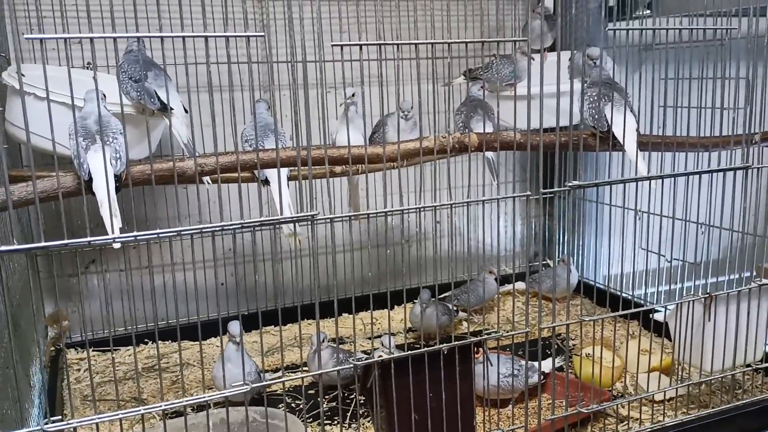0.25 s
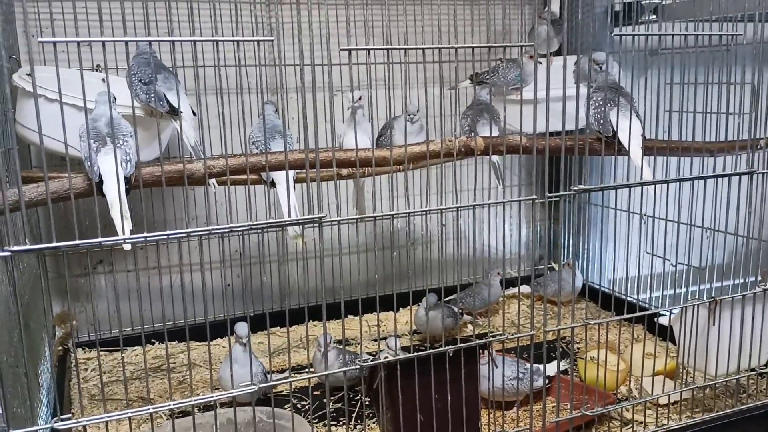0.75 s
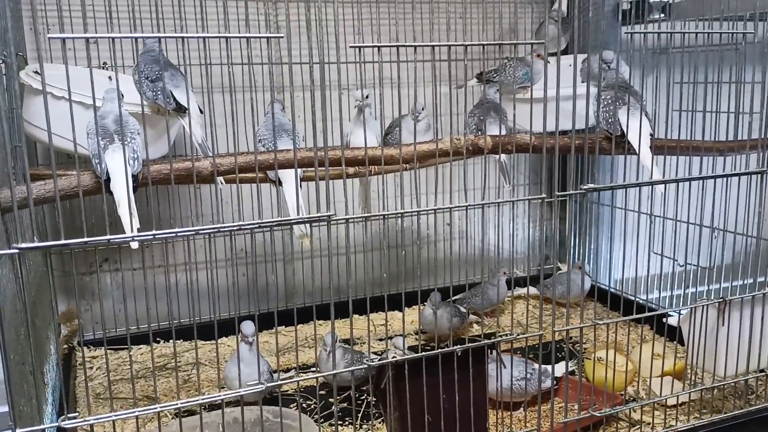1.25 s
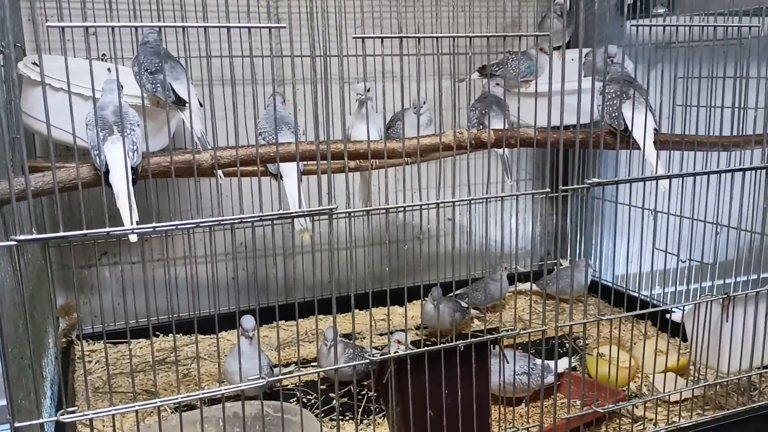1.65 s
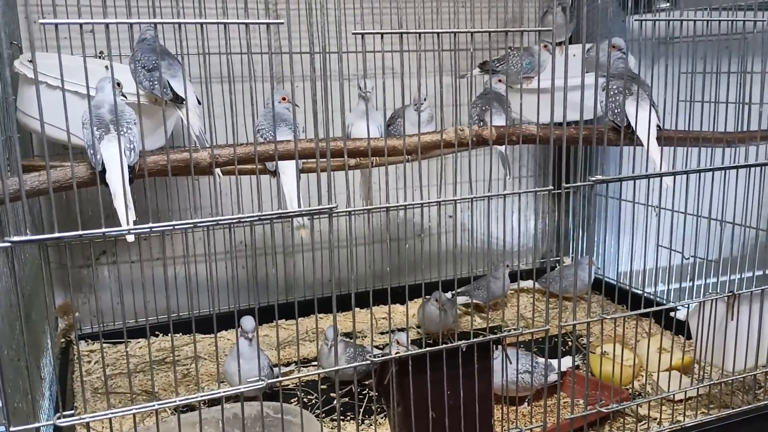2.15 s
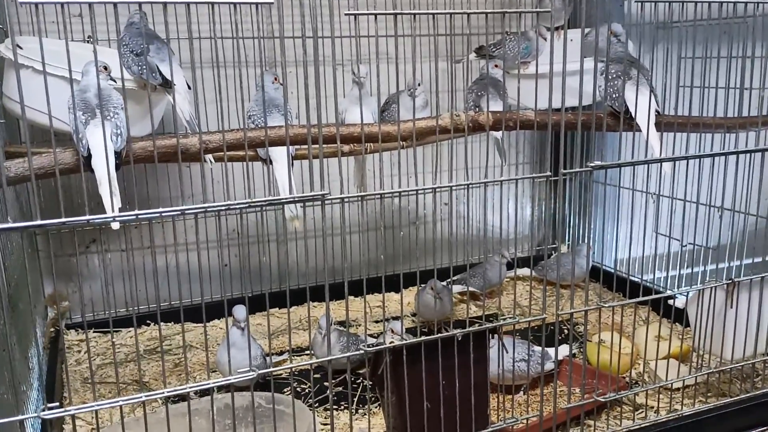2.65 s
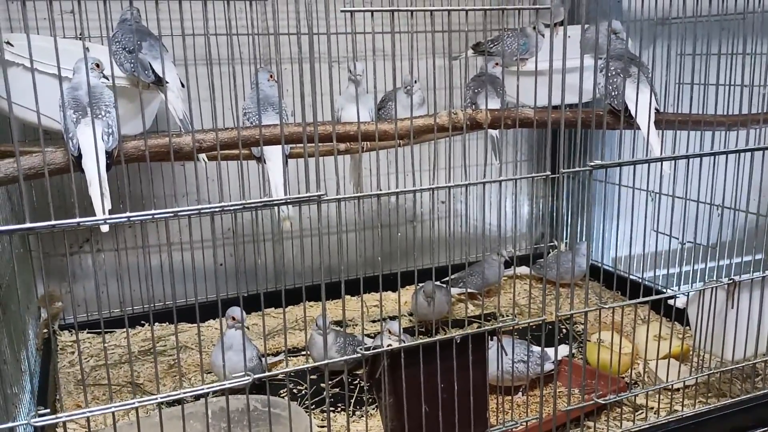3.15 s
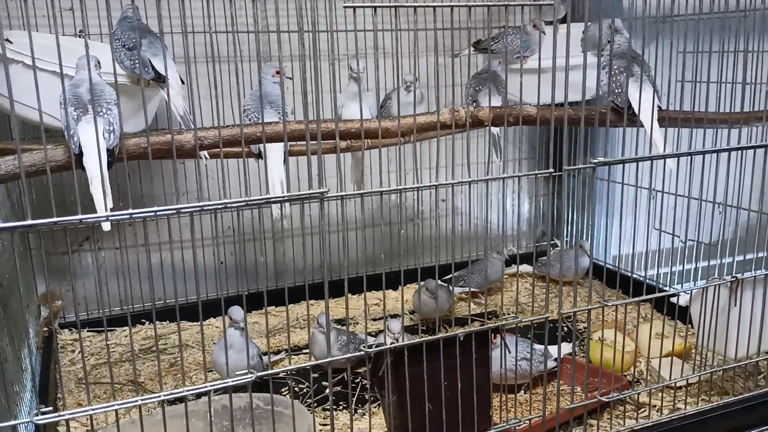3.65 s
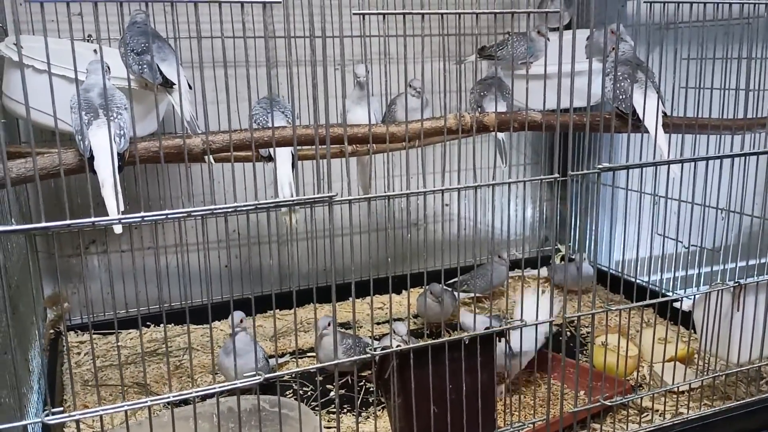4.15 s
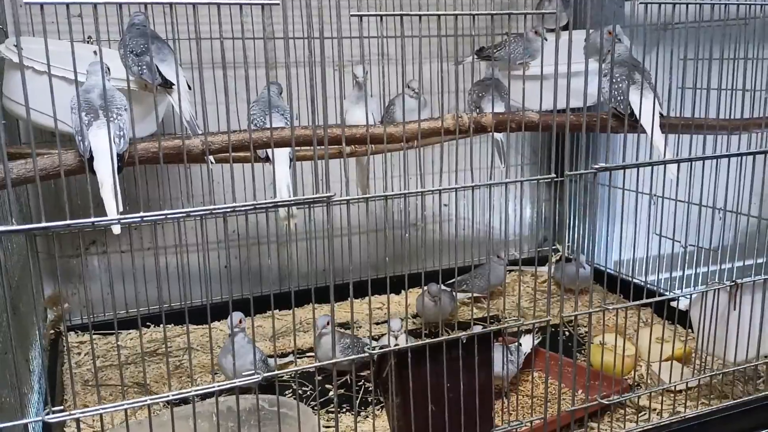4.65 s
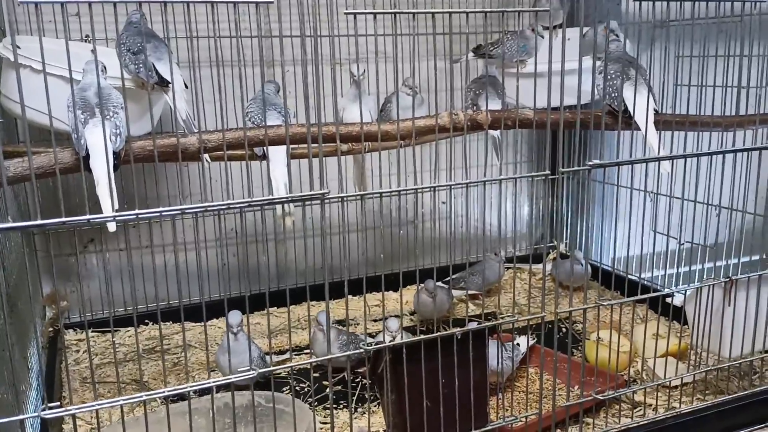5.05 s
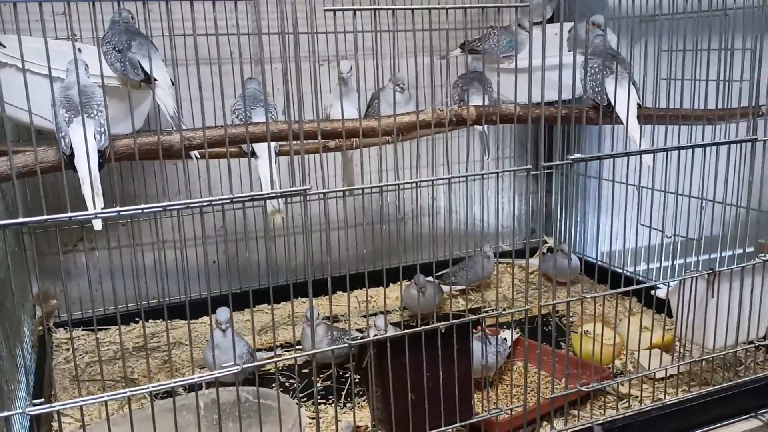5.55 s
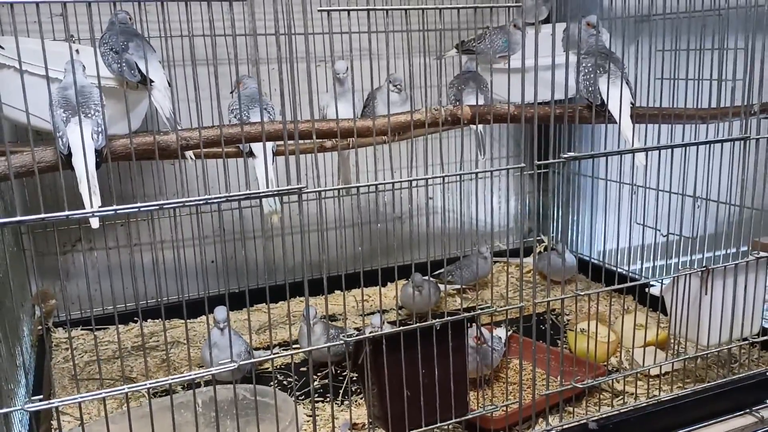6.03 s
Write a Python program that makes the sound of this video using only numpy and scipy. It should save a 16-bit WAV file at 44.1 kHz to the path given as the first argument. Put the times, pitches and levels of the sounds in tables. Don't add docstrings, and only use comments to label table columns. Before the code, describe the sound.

In an echoing indoor aviary, a caged bird gives a short run of nasal chatter, followed by quiet murmurs and a clear rising whistle. Wings then clap sharply with low thuds of air and feather hiss. After faint peeps and more flapping, a loud close squawk scoops upward with a low answer behind it. A final distant whistle and tiny peeps end the scene. Small microphone, quiet hum, clipped tails.

```python
import sys
import numpy as np
from scipy import signal
from scipy.io import wavfile
from scipy.ndimage import uniform_filter1d

SR = 44100
rng = np.random.default_rng(int(sys.argv[2]) if len(sys.argv) > 2 else 0)


def waveform_to_disk(signal):
    frames = np.transpose(np.atleast_2d(signal))
    scaled = np.clip(frames, -1, 1) * 32767
    samples = np.round(scaled).astype(np.int16)
    wavfile.write(sys.argv[1], SR, samples)


def volts_from_decibels(level):
    exponent = np.asarray(level, float) / 20
    return 10 ** exponent


N = 277277
EDGE_HZ = 15850


def evened(x):
    return x / np.sqrt(np.mean(x ** 2) + 1e-20)


def read(points, hz):
    f, value = np.transpose(points)
    return np.interp(np.log(hz + 1), np.log(f + 1), value)


def add(mix, s, sound):
    part = mix[max(round(s * SR), 0):][:len(sound)]
    part += sound[:len(part)]


def smoothed(x, size, axis=-1):
    return uniform_filter1d(uniform_filter1d(x, size, axis=axis), size, axis=axis)


def wander(count, size):
    return evened(smoothed(rng.standard_normal(count), size))


def noise(colour, count, patchy_db, size=512):
    hz = np.fft.rfftfreq(size, 1 / SR)
    a, b, patches = rng.standard_normal((4 * N // size + 8, len(hz), 3)).T
    patches = uniform_filter1d(uniform_filter1d(patches, size=6, axis=0), size=10, axis=1)
    level_db = read(colour, hz)[:, None] + patchy_db * evened(patches)
    z = (a + 1j * b) * volts_from_decibels(level_db)
    return evened(signal.istft(z, nperseg=size, noverlap=3 * size // 4)[1][:count])


def burst(rise, db, t60):
    t = np.arange(0, rise + t60, 1 / SR)
    level_db = db - 60 * np.maximum(t - rise, 0) / t60
    return (np.minimum(t / rise, 1) * volts_from_decibels(level_db)) ** 2


# (frequency [Hz], level [dB])
HUM_COLOUR = [(40, -21), (100, -6), (160, -15.5), (200, 8.5), (245, -21.5), (800, -19.5), (2500, -30),
              (4500, -30), (7800, -38), (11000, -37), (15500, -31.5)]


def room_hum():
    return volts_from_decibels(-62) * noise(HUM_COLOUR, N, patchy_db=2.3, size=1024)


# (time [s], level [dB])
AIR_STIR = [(0, -49), (.42, -59), (.55, -55.5), (1.498, -59.5), (1.88, -53.5), (2.15, -43), (2.4, -39),
            (2.62, -57), (3.2, -64), (3.33, -29), (3.45, -30), (3.8, -42), (4.149, -43.5), (4.5, -41),
            (4.85, -49.5), (5.08, -58.5), (5.799, -60.5), (6.29, -67)]
# (time [s], level [dB])
PUFFS = [(.12, -46), (.47, -48.5), (1.268, -48), (1.67, -56), (1.905, -35.5), (2.07, -36.5), (2.2, -35.5),
         (2.35, -43), (3.4, -33), (3.91, -35), (4.03, -34.5), (3.6, -38), (3.84, -36.5), (4.2, -40),
         (4.292, -51), (4.402, -31.5), (5.17, -53), (5.67, -51.5)]
# (frequency [Hz], level [dB])
AIR_COLOUR = [(76, -28), (130, -15.5), (188, -2), (309, -5.5), (348, -4.5), (453, -12.5), (596, -7.5),
              (645, -17.5), (786, -14.5), (1180, -24.5), (3000, -30.5), (3900, -56.5), (6600, -120)]
# (frequency [Hz], level [dB])
THUD_COLOUR = [(25, -29), (50, -9.5), (80, -6.5), (110, 0), (140, -21), (300, -61.5)]
# (frequency [Hz], width [Hz], level [dB])
CAGE_MODES = [(202.5, 14, 6), (353, 88, 3.5), (575, 18, -14)]


def wing_air():
    rush = noise(AIR_COLOUR, N, patchy_db=0.97, size=1024)
    thud = noise(THUD_COLOUR, N, patchy_db=-0.5, size=2048)
    shake, t = rng.standard_normal(N), np.arange(4000) / SR
    boom = np.zeros(N)
    for hz, width_hz, db in CAGE_MODES:
        ring = np.exp(-np.pi * width_hz * t) * np.sin(2 * np.pi * hz * t)
        boom += volts_from_decibels(db) * evened(signal.oaconvolve(shake, ring)[:N])
    stir_db = np.interp(np.arange(N) / SR, *np.transpose(AIR_STIR))
    power = volts_from_decibels(stir_db) ** 2
    rise_s, t60_s = 0.0098, 0.18
    for s, db in PUFFS:
        add(power, s - rise_s, burst(rise_s, db, t60_s))
    thud_db = -15.5 + 0.77 * stir_db
    return np.sqrt(power) * evened(rush + volts_from_decibels(-8) * boom) + volts_from_decibels(thud_db) * thud


# (time [s], rise [s], level [dB], decay t60 [s], crisp share [dB])
STROKES = [(0, 0.032, -42, 0.64, 5), (1.56, .06, -55, 2.3, 3.5), (1.68, 0.0085, -53.5, 0.65, -13),
           (1.75, 0.079, -46.5, 0.65, 6.5), (1.9, 0.015, -45, 1.8, -30), (2.05, .04, -49, 1.5, 3),
           (2.18, 0.0075, -41.5, 0.35, 2.5), (2.37, .03, -42, 0.44, -20), (2.74, 0.05, -65, 3.6, -6),
           (3.04, 0.0055, -57.5, 2.2, -10), (3.152, .012, -54.5, 2, 3.5), (3.232, 0.053, -40, 0.61, 10.5),
           (3.34, 0.031, -34.5, 0.89, -67), (3.5, 0.045, -50.5, 0.74, -7.5),
           (3.779, .02, -49.5, 3.5, -10.5), (3.9, .08, -38, 0.67, -14.5), (4.0, .07, -44, 1.3, 8.5),
           (4.23, 0.021, -40, 0.31, -12), (4.428, 0.014, -37, 0.31, -5), (4.62, .1, -54.5, 1, -18),
           (4.94, 0.011, -67, 0.52, 7.5), (5.39, .1, -70.5, 0.35, 10)]
# (time [s], level [dB], decay t60 [s], crisp share [dB])
CLAPS = [(2.001, -40, 1, -21), (2.135, -34, 0.39, -13), (2.266, -40, 0.34, 1.5), (2.31, -43, 0.34, 2),
         (2.346, -37, 0.33, -17), (2.427, -39.5, 0.28, -5), (4.482, -34, 0.51, -1.5)]
# (frequency [Hz], level [dB])
FEATHER_COLOUR = [(300, -15), (600, 0), (1200, -6), (2100, -5.5), (3400, -14.5), (5600, -11.5), (8000, -7),
                  (10600, -19), (13500, -16), (15500, -9)]


def feathers():
    hiss = noise(FEATHER_COLOUR, N, patchy_db=1.5)
    bright = evened(np.gradient(hiss))
    soft, crisp = np.zeros((2, N))
    clap_rise_s = 0.0011
    claps = [(s, clap_rise_s, *rest) for s, *rest in CLAPS]
    for s, rise, db, t60, crisp_db in STROKES + claps:
        add(soft, s, burst(rise, db, t60))
        add(crisp, s, burst(rise, db + crisp_db, t60))
    throb = volts_from_decibels(0.47 * wander(N, size=300))
    return throb * (np.sqrt(soft) * hiss + np.sqrt(crisp) * bright)


# (frequency [Hz], t60 [s])
ROOM_DECAY = [(300, 0.51), (1500, 0.72), (4000, 0.65), (8000, 0.49), (16000, 0.18)]


def room(x, direct_db, early_t60, late_db):
    hz, t, z = signal.stft(rng.standard_normal(SR), SR, nperseg=256)
    late = volts_from_decibels(late_db - 60 * t / read(ROOM_DECAY, hz)[:, None])
    early = volts_from_decibels(-60 * t / early_t60)
    tail = signal.istft(z * np.hypot(late, early), SR, nperseg=256)[1]
    tail = tail * np.clip(np.arange(len(tail)) / SR / 0.0012, 0, 1)
    return volts_from_decibels(direct_db) * x + signal.fftconvolve(x, tail / np.linalg.norm(tail))[:N]


def calls(tables, voice, *how, **more):
    track = np.zeros(N)
    for rows in tables:
        add(track, *voice(rows, *how, **more))
    return track


def unrolled(rows):
    s, *columns = np.transpose(rows)
    t = np.arange(s[0], s[-1], 1 / SR)
    return [s[0]] + [np.interp(t, s, c) for c in columns]


def nasal(rows, tract, jitter, breath_db, beak):
    s, hz, effort_db, tilt_db = unrolled(rows)
    turns = np.cumsum(hz * (1 + jitter * wander(len(hz), size=30))) / SR
    k = np.arange(1, 30)[:, None]
    tract_hz = k * hz * (hz.mean() / hz) ** beak
    colour_db = read(tract, tract_hz) + tilt_db * np.log2(k * hz / 3000)
    colour = volts_from_decibels(colour_db) * (k * hz < EDGE_HZ)
    rough = rng.standard_normal((2, len(k), len(hz)))
    rough = uniform_filter1d(uniform_filter1d(rough, size=36, axis=2), size=28, axis=2)
    a, b = evened(rough) / np.sqrt(2)
    breath = volts_from_decibels(breath_db) * np.minimum(k - .85, 1) * (a + 1j * b)
    overtones = ((1 + breath) * np.exp(2j * np.pi * k * turns + 1j * k ** 2)).real
    stack = (colour * overtones).sum(0) / np.sqrt((colour ** 2).sum(0))
    return s, volts_from_decibels(effort_db) * stack * signal.windows.tukey(len(hz), .25)


def syllable(row, shape, *how, **more):
    s, length, top_hz, effort_db, tilt_db = row
    rows = [(s + u * length, top_hz * pitch, effort_db + db, tilt_db + tilt)
            for u, pitch, db, tilt in shape]
    return nasal(rows, *how, **more)


# (time [s], pitch [Hz], effort [dB], brightness [dB per octave])
ANSWER = [
    [(0, 1348, -50, -10), (.04, 1257, -49, -7), (.09, 1227, -48, 2), (.125, 1170, -54, -8)],
    [(4.1, 826, -50, 0.0082), (4.125, 803.5, -23.5, 0.017), (4.19, 786, -39, 0.014),
     (4.25, 793, -27.5, 0.018), (4.3, 755, -43, 0.0035)],
]
# (frequency [Hz], level [dB])
ANSWER_TRACT = [(400, -29), (790, -8), (1580, -3), (2370, -7.5), (3160, -6), (5000, -9), (8000, -23.5),
                (15000, -40)]
# (time [s], length [s], top pitch [Hz], effort [dB], brightness [dB per octave])
MURMUR = [(1.105, 0.094, 693, -41.5, -0.88), (1.245, 0.044, 587, -43.5, -1.8),
          (1.372, 0.087, 690.5, -48.5, -0.79)]
# (share of length, pitch against top, effort [dB], brightness [dB per octave])
MURMUR_SLIDE = [(0, 1, 0.5, 2), (0.198, 1, 0, 0.966), (.55, .88, -5, -0.64), (1, .86, 2.5, -2.4)]
# (frequency [Hz], level [dB])
MURMUR_TRACT = [(240, -47), (400, -16.5), (624, -5), (695, -10.5), (1720, -9.5), (2490, -9), (3820, -19),
                (5200, -8), (7170, -12.5), (8630, -11.5), (9460, -18.5), (12100, -26), (15700, -27.5)]


def murmurs():
    low = calls(ANSWER, nasal, ANSWER_TRACT, jitter=0.0048, breath_db=-26, beak=.4)
    low += calls(MURMUR, syllable, MURMUR_SLIDE, MURMUR_TRACT, jitter=.01, breath_db=-5, beak=0)
    return room(low, direct_db=-0.5, early_t60=0.15, late_db=-6.5)


# (time [s], length [s], top pitch [Hz], effort [dB], brightness [dB per octave])
CHATTER = [(.42, 0.093, 862, -35, 1), (.546, 0.086, 835, -24.5, 0.5), (.672, 0.065, 849, -24, 3),
           (.803, 0.081, 810, -24, 0.5), (.895, 0.12, 738, -42, -1.5)]
# (share of length, pitch against top, effort [dB], brightness [dB per octave])
CHATTER_ARCH = [(0, .66, -7.5, -2), (.17, 1, -0.5, 1.5), (0.421, 0.95, 2.5, 3.5), (0.681, .7, -13.5, -2.5),
                (1, 0.72, -14.5, -11.5)]
# (frequency [Hz], level [dB])
CHATTER_TRACT = [(400, -16), (530, -4), (800, 3), (1600, -4), (2000, 0.5), (2500, -1), (3200, 8.5),
                 (3800, -38), (4400, -6.5), (5400, -20.5), (6800, -11.5), (10000, -28), (10900, -45),
                 (12400, -33.5), (14200, -29.5)]


def chatter():
    voice = calls(CHATTER, syllable, CHATTER_ARCH, CHATTER_TRACT, jitter=0.022, breath_db=-3.0, beak=0.077)
    return room(voice, direct_db=-4.5, early_t60=0.23, late_db=-15.0)


# (mean pitch [Hz], level [dB])
PEEP_LIFT = [(1100, 16.5), (1290, 9.5), (1500, 0.5), (2000, -14), (2250, -20), (2700, -13), (3100, 4),
             (3700, 8)]


def peep(row):
    s, length, first_hz, last_hz, effort_db = row
    second_db = read(PEEP_LIFT, (first_hz + last_hz) / 2)
    progress = np.linspace(0, 1, round(length * SR))
    bend = 1 - np.exp(-progress / 0.26) if last_hz > first_hz else progress ** .85
    hz = (first_hz + (last_hz - first_hz) * bend) * (1 + 0.0073 * wander(len(bend), size=40))
    turns = np.cumsum(hz) / SR
    tone = np.cos(2 * np.pi * turns)
    wide = abs(last_hz - first_hz) > 400 and last_hz < 3000
    fade_db = 26 * wide
    for k in range(2, 6):
        overtone_db = second_db - 10.5 * (k - 2) - fade_db * progress
        distance_loss = 1 + (k * hz / 8300) ** 20
        tone = tone + volts_from_decibels(overtone_db) * np.cos(2 * np.pi * k * turns) / distance_loss
    return s, volts_from_decibels(effort_db) * tone * signal.windows.tukey(len(hz), .2)


# (time [s], length [s], first pitch [Hz], last pitch [Hz], effort [dB])
PEEPS = [(1.04, 0.016, 1222, 1382, -49.5), (1.196, 0.017, 4187, 1935, -36.5),
         (2.268, 0.01, 2130, 2150, -41), (2.498, 0.0097, 1064, 1290, -50.5),
         (2.628, 0.022, 1180, 1807, -57.5), (2.737, 0.013, 2030, 2160, -53.5),
         (2.76, 0.014, 1194, 1786, -47), (2.862, 0.032, 1135, 1060, -67), (2.912, 0.027, 1133, 1790, -47.5),
         (2.965, 0.075, 1845, 2163, -54.5), (3.048, 0.023, 1117, 1093, -71),
         (3.156, 0.025, 1297, 2080, -41.5), (5.86, 0.0106, 2380, 2960, -56.5),
         (5.865, .014, 3256, 4170, -66.5), (6.013, 0.03, 4430, 2120, -51.5),
         (6.138, 0.0098, 2997, 4280, -66)]


def far_peeps():
    return room(calls(PEEPS, peep), direct_db=-13, early_t60=0.24, late_db=-23)


# (frequency [Hz], level [dB])
WHISTLE_TRACT = [(1400, -6), (2300, 4.5), (3400, -18), (4600, -22), (6500, -24.5), (8500, -36),
                 (11000, -51.5), (15000, -37.5)]


def whistle(rows):
    s, hz, effort_db, rasp_db = unrolled(rows)
    turns = np.cumsum(hz * (1 + 0.012 * wander(len(hz), size=50))) / SR
    k = np.arange(1, 10)[:, None]
    colour = volts_from_decibels(read(WHISTLE_TRACT, k * hz)) * (k * hz < EDGE_HZ)
    tone = (colour * np.cos(2 * np.pi * k * turns)).sum(0)
    rasp = np.cos(np.pi * turns) + 0.59 * wander(len(hz), size=8)
    tone = tone * (1 + volts_from_decibels(rasp_db) * rasp)
    return s, np.sqrt(2) * volts_from_decibels(effort_db) * tone * signal.windows.tukey(len(hz), .1)


def rising_whistle(row):
    s, length, top_hz, effort_db, middle = row
    u = np.linspace(0, 1, num=24)
    scoop = 0.17
    glide = scoop * np.minimum(u / 0.13, 1) + (1 - scoop) / (1 + np.exp((middle - u) / 0.14))
    rise_end, fall_start = 0.13, 0.59
    attack_db = -18.5 * np.interp(u, [0, rise_end, 1], [1, 0, 0]) ** 2
    release_db = np.interp(u, [0, fall_start, 1], [0, 0, -23.5])
    low_db = -6.5 * (1 - glide)
    start = 0.66
    hz = top_hz * (start + (1 - start) * glide)
    rasp_db = -14.5 - 52 * glide
    level_db = effort_db + attack_db + release_db + low_db
    return whistle(np.transpose([s + u * length, hz, level_db, rasp_db]))


# (time [s], length [s], top pitch [Hz], effort [dB], share of length at mid glide)
WHISTLES = [(1.558, 0.15, 2457, -38.5, 0.41), (1.745, 0.13, 2374, -15.5, 0.55),
            (5.388, 0.17, 2301, -21.5, .54)]


def whistles():
    return room(calls(WHISTLES, rising_whistle), direct_db=-14, early_t60=0.42, late_db=-16.0)


# (time [s], pitch [Hz], effort [dB], brightness [dB per octave])
SCOOP = [
    [(4.003, 547, -38, -1), (4.016, 716, -24, -1.22), (4.03, 848.4, -18.5, 1), (4.05, 875, -18.5, 2),
     (4.068, 1000, -39, 2)],
]
# (frequency [Hz], level [dB])
SCOOP_TRACT = [(290, -34.5), (500, -1), (1750, -6.5), (2110, -8.5), (2740, -10.5), (3260, 1), (4290, -3),
               (5250, -2), (5800, -14), (7860, -2), (8690, -18.5), (11800, -33.5), (15700, -17)]
# (time [s], pitch [Hz], effort [dB], brightness [dB per octave])
SQUAWK = [
    [(4.05, 941, -32.5, -1.5), (4.072, 939, -11, 1.4), (4.1, 1004, -10.5, 0), (4.13, 945, -17, 3),
     (4.165, 937.4, -39, -2.2)],
]
# (frequency [Hz], level [dB])
SQUAWK_TRACT = [(350, -66), (600, -48.5), (856, -26.5), (1650, -48.5), (2260, -43.5), (3260, -9),
                (3790, 1.5), (4410, -8), (4980, 0), (6370, -22.5), (7510, 1), (8800, -20.5), (9800, -20),
                (10700, -36), (11600, -19.5), (13700, -39), (15700, -25.5)]


def squawk():
    cry = calls(SCOOP, nasal, SCOOP_TRACT, jitter=0.026, breath_db=-2, beak=0.64)
    cry += calls(SQUAWK, nasal, SQUAWK_TRACT, jitter=0.01, breath_db=-19.0, beak=0.63)
    return room(cry, direct_db=0.5, early_t60=0.059, late_db=-1.0)


def scene():
    wings = wing_air() + feathers()
    birds = murmurs() + chatter() + far_peeps() + whistles() + squawk()
    return (room_hum() + wings + birds)[None]


def band_limit(x):
    return signal.sosfilt(signal.butter(12, 16850, fs=SR, output="sos"), x)


def record(dry):
    power_db = 10 * np.log10(abs(uniform_filter1d(dry[0] ** 2, size=900)) + 1e-12)
    fall = np.arange(N) * 230.0 / SR
    held_db = np.maximum.accumulate(power_db + fall) - fall
    gate_db = -6 * np.clip((-50.5 - held_db) / 6, 0, 1)
    gated = dry * volts_from_decibels(uniform_filter1d(gate_db, size=200))
    gated = signal.sosfilt(signal.butter(3, 55, "high", fs=SR, output="sos"), gated)
    lowpass = signal.firwin(2047, EDGE_HZ, window=("kaiser", 9), fs=SR)
    limited = signal.oaconvolve(gated, lowpass[None], "same")
    return band_limit(limited)


dry = scene()
out = record(dry)
waveform_to_disk(out)
```